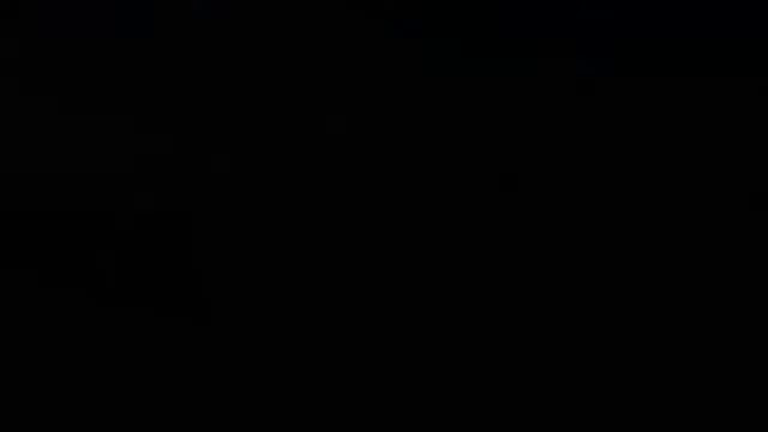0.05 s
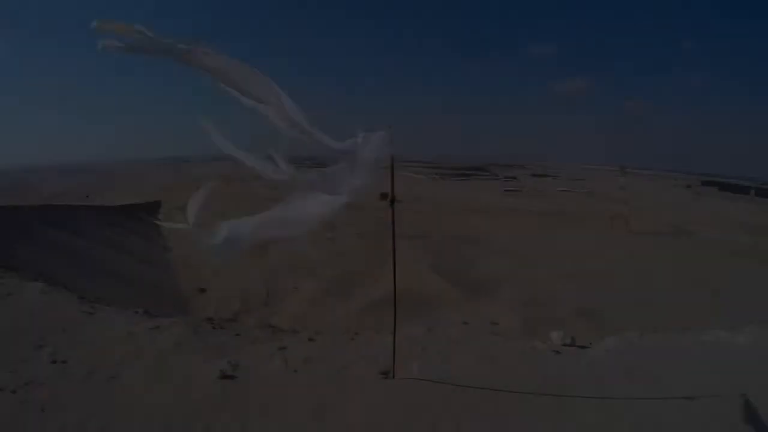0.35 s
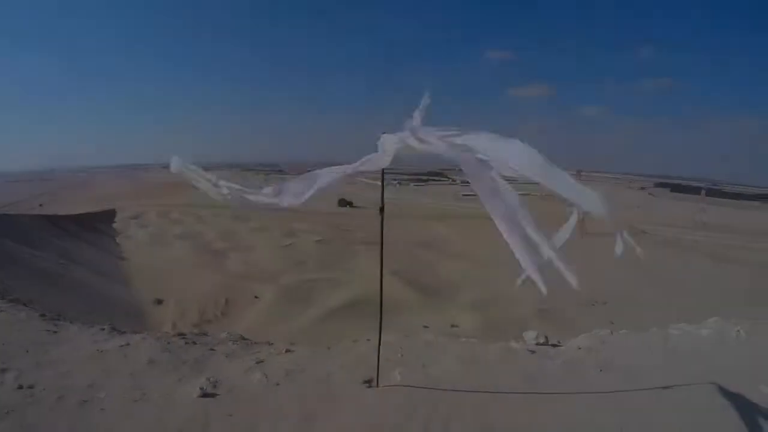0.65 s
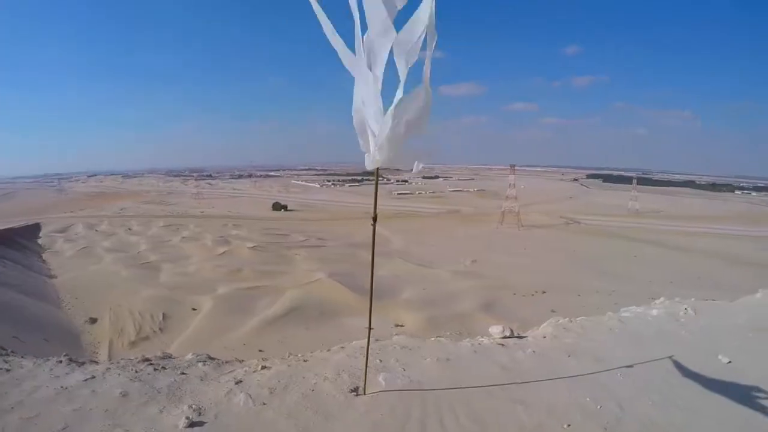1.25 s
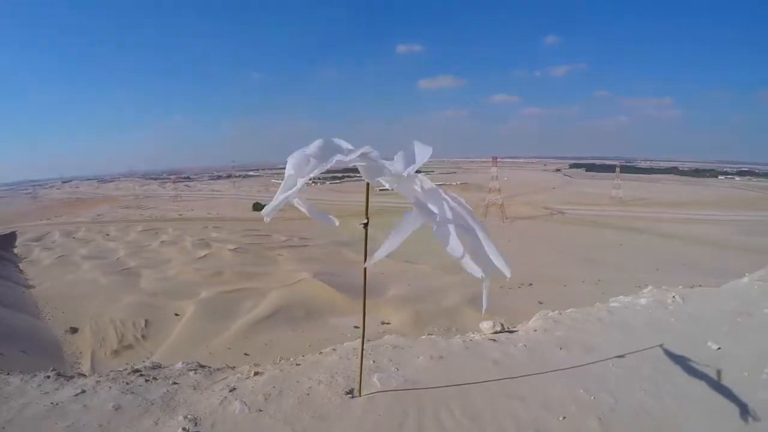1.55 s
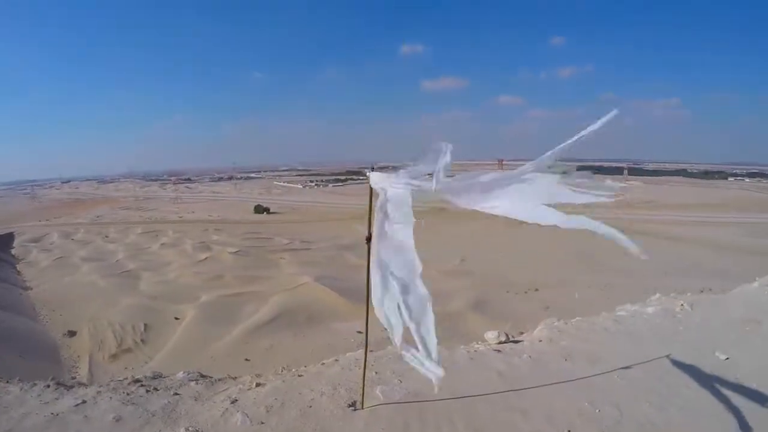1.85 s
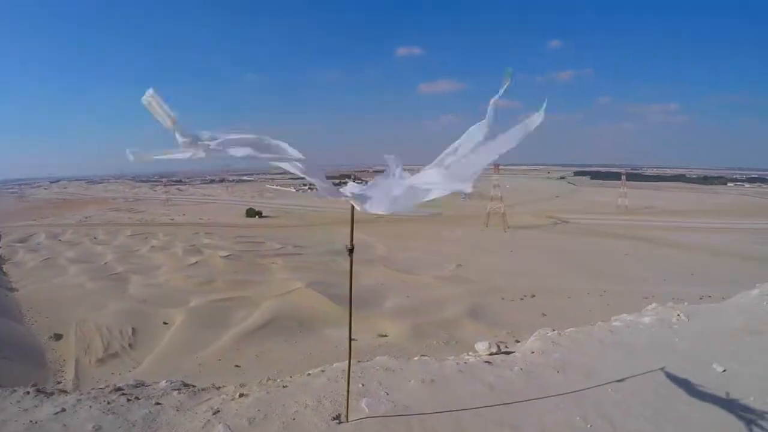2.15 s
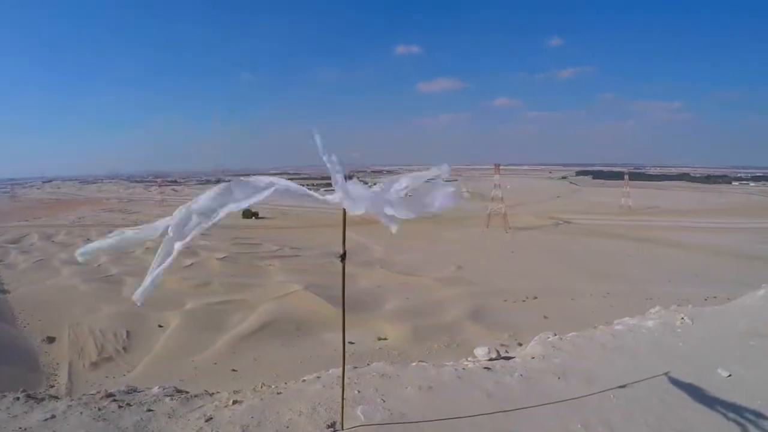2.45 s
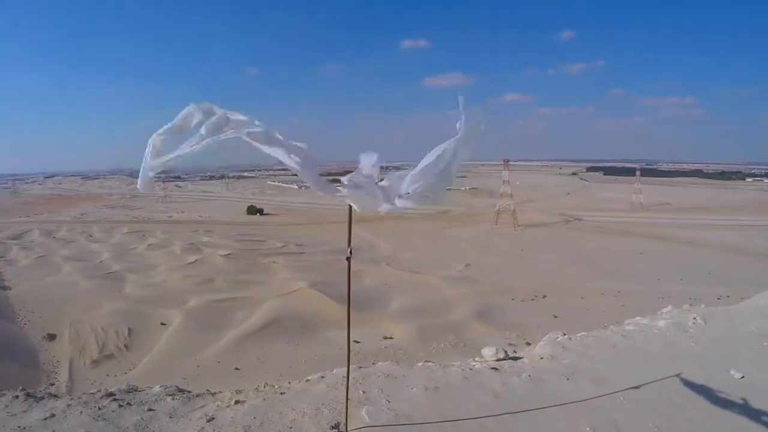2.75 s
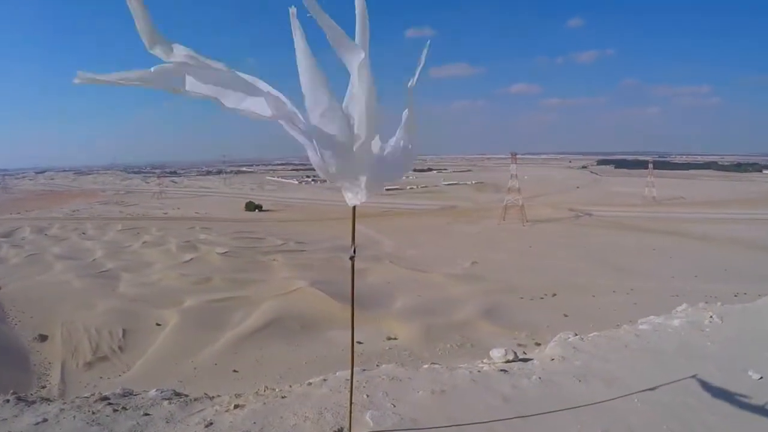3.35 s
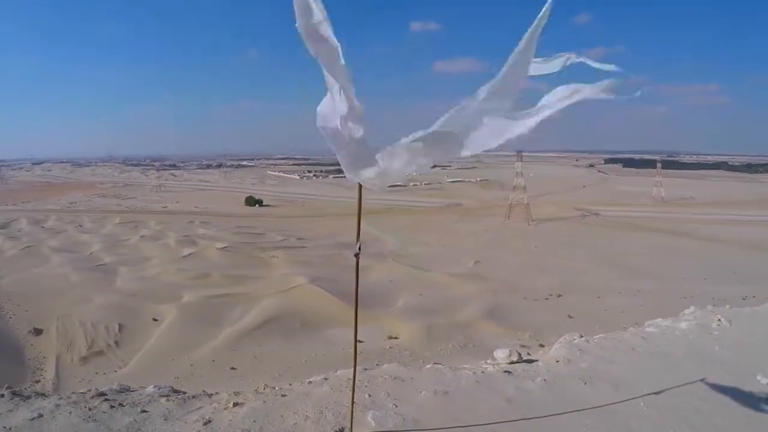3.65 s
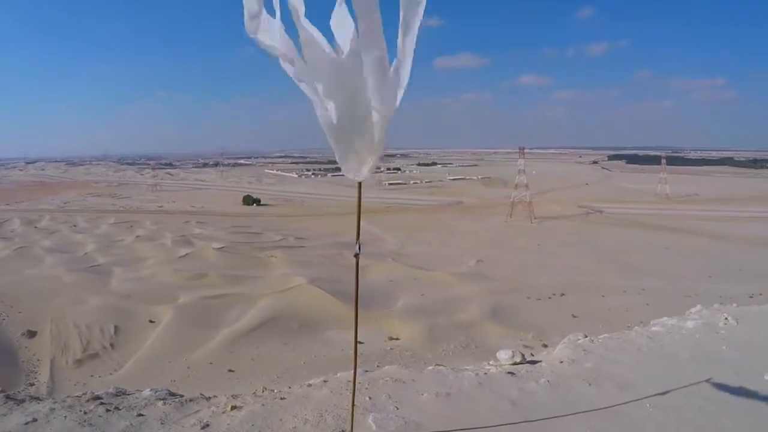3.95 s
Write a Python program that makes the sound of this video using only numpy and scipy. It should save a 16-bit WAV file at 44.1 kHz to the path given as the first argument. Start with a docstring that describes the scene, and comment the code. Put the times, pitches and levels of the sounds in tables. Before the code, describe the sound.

Gusting wind fades in from silence over the first second, buffeting the microphone with a deep, uneven throb and rumble, strongest around 1.6 and 2.2 seconds. From about 0.5 seconds, nearby cloth streamers rustle, flap and snap irregularly until the end at 4 seconds. A soft hiss and faint whistle lie underneath, with a brief low drone near 1.8 seconds and a few soft thumps. Open air, no echo.

```python
"""A deep throb of gusting desert wind fades in from silence, buffeting a microphone beside a pole.
Wind pressure makes the throb; eddies add a lumpy rumble, a soft rush and a few thumps.
Fabric streamers on the pole rustle as they ripple, flap as they fold and snap as their tips whip taut.
A fine air hiss, a low drone and a faint whistle lie underneath. Open air, no echo."""
import sys
import numpy as np
from scipy import signal
from scipy.fft import rfft, irfft
from scipy.io import wavfile
from scipy.ndimage import uniform_filter1d

SR = 44100
rng = np.random.default_rng(int(sys.argv[2]) if len(sys.argv) > 2 else 0)


def transcribe(u):
    """Save the signal u as a 16-bit wav file named by the first command-line argument.

    u: samples, shape (n,) or (channels, n), limited to [-1, 1]; the rate is SR.
    q: integer samples, one column per channel.
    """
    v = np.clip(np.atleast_2d(u).T, -1, 1)
    q = np.round(v * 32767).astype(np.int16)
    wavfile.write(sys.argv[1], SR, q)


N = 176400
T = np.arange(N) / SR

# Table levels are relative; each source applies its own gain.
# wind pressure on the microphone (time [s], level [dB])
THROB_CURVE = [(0.0,-100),(0.11,-97),(0.2,-47.5),(0.42,-33),(0.75,-25.5),(0.82,-19),(0.96,-15),(1.12,-18.5),(1.18,-26.5),(1.26,-20),(1.40,-13.5),(1.52,-28.5),(1.62,-10),(1.72,-16),(1.88,-17),(2.03,-18),(2.15,-13),(2.27,-20),(2.37,-16),(2.44,-29),(2.54,-16.5),(2.73,-20.5),(2.84,-32.5),(2.93,-20.5),(3.08,-32),(3.25,-26),(3.41,-19.5),(3.5,-29.5),(3.7,-22),(3.8,-21),(3.98,-19.5)]
# eddies around the housing (time [s], rumble level [dB], rush and hiss level [dB])
GUST_CURVE = [(0.12,-100,-115),(0.25,-66,-80),(0.41,-54,-64),(0.52,-47,-61),(0.72,-43,-55),(0.82,-33.5,-54.5),(1.0,-40.5,-54),(1.25,-37.5,-54.5),(1.55,-38.5,-54.5),(1.68,-43.5,-52.5),(1.87,-33,-52.5),(2.05,-45.5,-52.5),(2.3,-40.5,-52.5),(2.58,-36.5,-52),(2.8,-41.5,-54.5),(2.96,-35,-51.5),(3.11,-38.5,-54.5),(3.4,-40,-54),(3.58,-40,-53),(3.78,-34,-50.5),(3.98,-42,-55.5)]
# streamer flutter (time [s], level [dB])
FLUTTER_CURVE = [(0.15,-99),(0.25,-70.5),(0.4,-64),(0.46,-49),(0.6,-50.5),(0.78,-47),(0.87,-40.5),(0.94,-51.5),(1.0,-39.5),(1.08,-48),(1.24,-42.5),(1.31,-44.5),(1.4,-41),(1.46,-38.5),(1.51,-48),(1.56,-44),(1.61,-51.5),(1.82,-48),(2.02,-51),(2.22,-47),(2.35,-51.5),(2.49,-43),(2.55,-52.5),(2.65,-45),(2.86,-52),(2.96,-43),(3.06,-50.5),(3.2,-46.5),(3.3,-52.5),(3.39,-42.5),(3.56,-45),(3.69,-44.5),(3.77,-41),(3.88,-44.5),(3.98,-43)]
# low drone (time [s], level [dB])
DRONE_CURVE = [(0.4,-120),(1.35,-46),(1.55,-42.5),(1.75,-36.5),(1.9,-35),(2.05,-48),(2.6,-73)]
# faint whistle (time [s], level [dB])
WHISTLE_CURVE = [(0.15,-110),(0.5,-76),(0.8,-65),(1.5,-67),(2.0,-60),(2.7,-73),(3.15,-89),(3.4,-54.5),(3.7,-64),(3.98,-66)]
# single eddies on the microphone (time [s], level [dB], pitch [Hz])
THUMP_EVENTS = [(0.445, -23, 119.4), (2.542, -30, 111), (3.81, -31, 140)]
# tip snaps (time [s], level [dB], body gain [dB], treble gain [dB])
SNAP_EVENTS = [(0.644,-31.5,-10,-19),(0.689,-31,-16,-12),(0.699,-37,-5,-14),(0.755,-33.5,-6,-14),(0.819,-37.5,-12,-4.5),(0.867,-29.5,-9.5,-12),(1.226,-28.5,-2,-28),(1.253,-35,-5,-7),(1.333,-29,-11,-19),(1.370,-29,-10,-24),(1.442,-27.5,-8,-28),(1.568,-24,-12.5,-17),(1.604,-33.5,-9,-11),(1.635,-39,1,-11),(1.828,-36.5,-2.5,-25),(1.919,-25,-24,-18),(2.241,-29.5,-9,-18),(2.319,-36,-2,-26),(2.486,-42.5,7,-28),(2.719,-42,5.5,-26),(2.782,-31,-5,-11),(2.824,-34,-24,-13),(2.878,-28,-13,-23),(3.019,-29,-4,-13),(3.109,-35,-4.5,-26),(3.159,-33,-7,-27),(3.327,-32,-12,-13),(3.404,-27,-5,-22),(3.438,-25.5,-17,-11),(3.649,-22,-11,-12.5),(3.811,-41,3,-5),(3.871,-32,-3.5,-11),(3.937,-37.5,-13,-3.5)]
# whole-streamer flaps (centre time [s], level [dB], Gaussian sigma [s])
FLAP_EVENTS = [(0.882,-45,0.0092),(1,-60,0.003),(1.158,-42.5,.007),(1.343,-42,0.0051),(1.413,-42.5,0.019),(2.584,-38.5,0.0025),(2.771,-42.5,.003),(3.384,-40,0.0075),(3.632,-40,0.0033),(3.744,-41.5,0.0097),(3.791,-43,0.01)]
# fold flicks (time [s], level [dB], band centre [Hz])
FLICK_EVENTS = [(0.442, -48, 1110), (1.104, -34.5, 1460), (1.115, -36.5, 1730)]
# pressure throb (frequency [Hz], level [dB])
THROB_SPECTRUM = [(4, -26), (12, -11.5), (19, 2.5), (24, -4), (31, -11.5), (42, -18.5), (52, -24.5),
                  (72, -50.5), (200, -94.5)]
# eddy rumble (frequency [Hz], level [dB])
RUMBLE_SPECTRUM = [(25, -22.5), (55, 3.5), (75, -0.5), (98, 0), (127, -8), (147, -5), (175, -14.5),
                   (240, -23.5), (400, -41.5), (1000, -60)]
# air rush (frequency [Hz], level [dB])
RUSH_SPECTRUM = [(100, -13), (230, 1), (330, -1.5), (400, -4.5), (520, -6), (900, -10.5), (2000, -13),
                 (5000, -22), (9000, -26.5), (15000, -27)]
# rubbing cloth (frequency [Hz], level [dB])
CLOTH_SPECTRUM = [(200, -27.5), (800, -17), (1500, -12.5), (2000, -11.5), (2300, 4.5), (2500, 2.5),
                  (2670, -0.5), (2920, 5), (3300, 0.5), (3600, -2.5), (3950, -9.5), (4300, -2), (4780, 1.5),
                  (5150, -10), (5800, -4.5), (6250, -6), (6600, -9.5), (7300, -7), (8500, -16),
                  (10500, -19.5), (14500, -21.5), (16000, -9)]
# hem crackle (frequency [Hz], level [dB])
CRACKLE_SPECTRUM = [(300, -14), (1200, -9), (3000, -3), (7000, -4), (10000, -5.5), (15000, -3)]
# air hiss (frequency [Hz], level [dB])
HISS_SPECTRUM = [(1500, -36), (2400, 1), (3000, -10), (3800, -3), (4750, 6), (5300, 2), (7500, -6),
                 (9500, -3.5), (14000, -11), (15500, -33)]


def wind(throb_db=1, rumble_db=2, rush_db=2):
    """Pressure throbs on the microphone; the same eddies modulate both rumble and rush."""
    eddies = drift(rate_hz=9.5)
    throb = steadied(coloured(noise(), THROB_SPECTRUM), span_s=0.19)
    rumble = steadied(coloured(noise(), RUMBLE_SPECTRUM), span_s=0.146) * amp(1.7 * eddies)
    flickering = noise() * amp(0.81 * eddies + 1.17 * drift(rate_hz=107))
    rush = coloured(flickering, RUSH_SPECTRUM)
    return (amp(throb_db) * level(THROB_CURVE) * throb
            + amp(rumble_db) * level(GUST_CURVE) * rumble
            + amp(rush_db) * level(GUST_CURVE, column=2) * rush)


def thumps(rise_s=0.0078, sag=0.049):
    """Single eddies hit the microphone: low sine pulses, sagging in pitch."""
    out, t = np.zeros(N), T[:SR // 8]
    age = t / rise_s
    envelope = (age * np.exp(1 - age)) ** 2
    for time_s, db, hz in THUMP_EVENTS:
        glide_hz = hz * (1 - sag + 2 * sag * np.exp(-age / 2))
        phase = 2 * np.pi * np.cumsum(glide_hz) / SR
        add(out, time_s, -amp(db) * envelope * np.sin(phase))
    return out


def streamers(ripple_db=-6, rustle_db=-6.5, crackle_db=-15, sway_db=1.5, crack_decay_s=0.0012):
    """Cloth ripples, rubs steadily and crackles brightly at its hems."""
    rippling = coloured(ripples(strips=10), CLOTH_SPECTRUM)
    rustle = coloured(noise() * amp(sway_db * drift(rate_hz=51.5)), CLOTH_SPECTRUM)
    crack_decay = np.exp(-T[:SR // 20] / crack_decay_s)
    cracks = signal.fftconvolve(impulses(per_s=70, spread_db=2.2), crack_decay)[:N]
    crackle = coloured(cracks * noise(), CRACKLE_SPECTRUM)
    cloth = amp(ripple_db) * rippling + amp(rustle_db) * rustle + amp(crackle_db) * crackle
    return level(FLUTTER_CURVE) * cloth


def ripples(strips, total_per_s=120, rise_s=0.0021, decay_s=0.002):
    """Ripples run along each strip; each sets off a clump of tiny creases."""
    t = T[:SR // 20]
    clump = (1 - np.exp(-t / rise_s)) * np.exp(-t / decay_s)
    onsets = [impulses(total_per_s / strips, spread_db=3) for _ in range(strips)]
    power = np.abs([signal.fftconvolve(train ** 2, clump)[:N] for train in onsets])
    power /= uniform_filter1d(power.sum(0), size=5000) + 1e-3  # even out slow swells
    out = np.zeros(N)
    for strip_power in power:
        creases = impulses(per_s=5000, spread_db=0.5) * noise()
        out += folded(creases * np.sqrt(strip_power))
    return out


def snaps(rise_s=0.0009, hold_s=0.0025, decay_s=0.0022, tail_s=0.01, tail_db=-13):
    """A tip whips taut: a short three-band burst with a faint tail."""
    out, t = np.zeros(N), T[:4096]
    hz = np.fft.rfftfreq(len(t), 1 / SR)
    body_hz, treble_hz = 3700, 8000
    bands = [hz < body_hz, (hz >= body_hz) & (hz < treble_hz), hz >= treble_hz]
    attack = np.minimum(t / rise_s, 1)
    fall = np.exp(-np.maximum(t - hold_s, 0) / decay_s)
    tail = amp(tail_db) * np.exp(-t / tail_s)
    for time_s, db, body_db, treble_db in SNAP_EVENTS:
        spectrum = rfft(cloth_noise(len(t)))
        gains = amp([body_db - 1, -7.5, treble_db + 6])  # body, mid, treble
        burst = sum(gain * unit_rms(irfft(spectrum * band)) for gain, band in zip(gains, bands))
        add(out, time_s, amp(db - 5.5) * attack * (fall + tail) * burst)
    return out


def flaps(cutoff_hz=3480):
    """A whole streamer folds over: a short, dull swell of rustle."""
    out, t = np.zeros(N), T[:4096]
    lowpass = signal.butter(2, cutoff_hz, fs=SR)
    for centre_s, db, sigma_s in FLAP_EVENTS:
        cloth = unit_rms(signal.lfilter(*lowpass, cloth_noise(len(t))))
        swell = np.exp(-0.5 * ((t - t.mean()) / sigma_s) ** 2)
        add(out, centre_s - t.mean(), amp(db) * swell * cloth)
    return out


def flicks(decay_s=0.003):
    """A fold flicks: a dull puff of band-passed noise."""
    out, t = np.zeros(N), T[:SR // 8]
    for time_s, db, hz in FLICK_EVENTS:
        bandpass = signal.butter(2, hz * np.exp([-0.25, 0.25]), "bandpass", fs=SR)
        puff = unit_rms(signal.lfilter(*bandpass, noise(len(t))))
        add(out, time_s, amp(db) * np.exp(-t / decay_s) * puff)
    return out


def cloth_noise(samples):
    """Rustle of one fold, rms 1."""
    return coloured(folded(noise(samples)), CLOTH_SPECTRUM, fft_size=2048)


def folded(x, echo_gain=0.41, max_tilt_db=8, corner_hz=2800):
    """Each fold has its own colour: a treble tilt and a second crease just after the first."""
    hz = np.fft.rfftfreq(len(x), 1 / SR)
    delay_s = rng.uniform(0.0004, 0.0014)
    tilt_db = max_tilt_db * rng.uniform(-1, 1)
    comb = 1 + rng.choice([-1, 1]) * echo_gain * np.exp(-2j * np.pi * hz * delay_s)
    treble = np.tanh(np.log2(np.maximum(hz / corner_hz, 1)))
    return irfft(rfft(x) * comb * amp(tilt_db * (treble - 0.5)), len(x))


def hiss(gain_db=-7.5):
    """Fine hiss of moving air, following the gusts."""
    return amp(gain_db) * level(GUST_CURVE, column=2) * coloured(noise(), HISS_SPECTRUM)


def wind_tone(curve, centre_hz, width_hz):
    """Breathy tone in the wind: narrow-band noise on a level curve."""
    hz = np.fft.rfftfreq(N, 1 / SR)
    band = 1 / (1 + (2 * (hz - centre_hz) / width_hz) ** 2)
    tone = unit_rms(irfft(rfft(noise()) * band, N))
    return level(curve) * steadied(tone, span_s=0.63)


def amp(db):
    """Decibels to gain."""
    return 10 ** (np.asarray(db) / 20)


def noise(samples=N):
    """White Gaussian noise."""
    return rng.standard_normal(samples)


def unit_rms(x):
    """Scales to rms 1."""
    return x / np.sqrt(np.mean(x ** 2) + 1e-20)


def level(curve, column=1):
    """Gain over time from one dB column."""
    rows = np.array(curve)
    return amp(np.interp(T, rows[:, 0], rows[:, column]))


def add(mix, time_s, sound):
    """Mixes a sound in at a time."""
    part = mix[max(round(time_s * SR), 0):][:len(sound)]
    part += sound[:len(part)]


def coloured(x, spectrum, fft_size=16384):
    """Minimum-phase filter to a spectrum; output rms 1."""
    hz, db = np.transpose(spectrum)
    bin_hz = abs(np.fft.fftfreq(fft_size, 1 / SR))
    log_gain = np.log(amp(np.interp(np.log(bin_hz + 1), np.log(hz), db)))
    response = np.exp(np.conj(signal.hilbert(log_gain)))
    taps = np.fft.ifft(response).real[:fft_size // 2]
    return unit_rms(signal.fftconvolve(x, taps)[:len(x)])


def drift(rate_hz):
    """Random wander, rms 1, rolling off at a rate."""
    hz = np.fft.rfftfreq(N, 1 / SR)
    return unit_rms(irfft(rfft(noise()) * np.exp(-(hz / rate_hz) ** 2), N))


def steadied(x, span_s):
    """Removes swells slower than a span, so a level curve can set them."""
    power = uniform_filter1d(abs(signal.hilbert(x)) ** 2, int(span_s * SR)) / 2
    return x / np.sqrt(power + 1e-9)


def impulses(per_s, spread_db):
    """Random impulses, most small, a few larger."""
    size = amp(spread_db * np.minimum(rng.exponential(1, N), 4))
    return size * (rng.random(N) < per_s / SR)


def scene():
    """Wind and cloth, mono."""
    air = wind() + hiss()
    drone = wind_tone(DRONE_CURVE, centre_hz=93, width_hz=28)
    whistle = wind_tone(WHISTLE_CURVE, centre_hz=429.5, width_hz=46)
    return (air + drone + whistle + streamers() + flaps() + snaps() + thumps() + flicks())[None]


def record(dry):
    """Steep low-pass band limit."""
    cutoff_hz = 15150
    taps = signal.firwin(401, cutoff_hz, window=("kaiser", 9), fs=SR)
    return signal.oaconvolve(dry, taps[None], "same")


dry = scene()
out = record(dry)
transcribe(out)
```